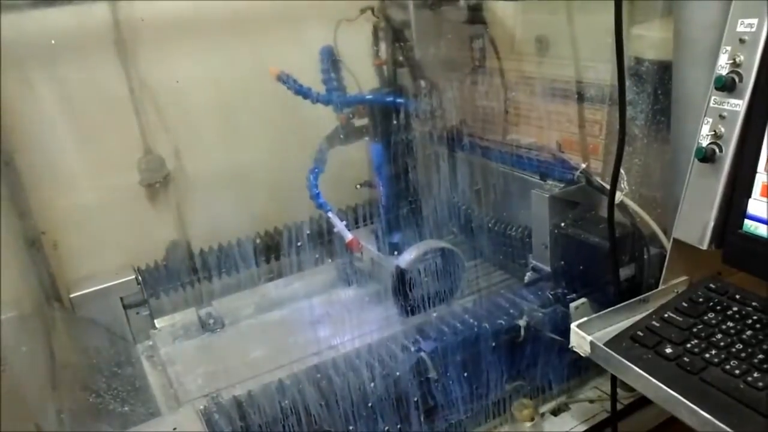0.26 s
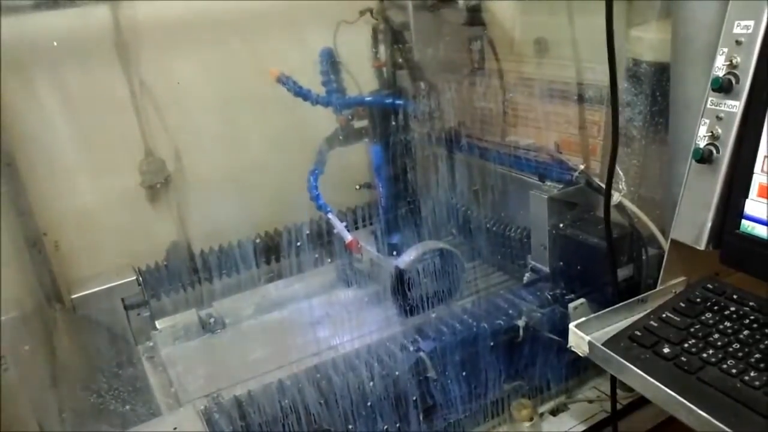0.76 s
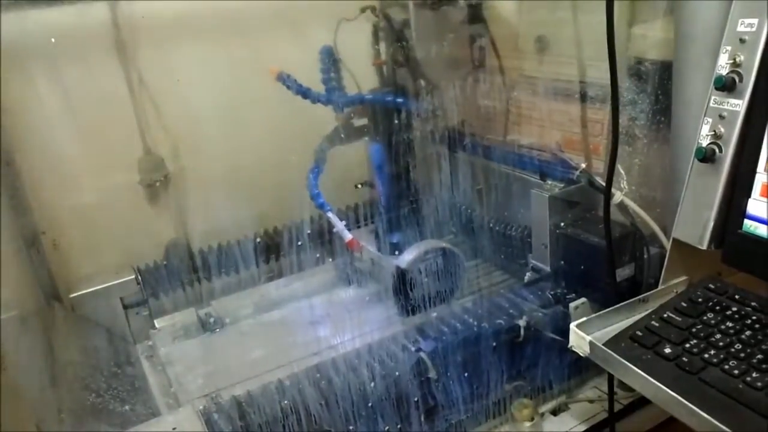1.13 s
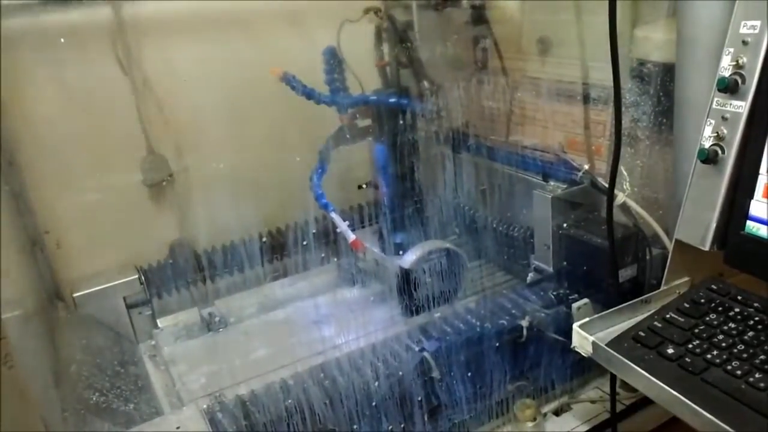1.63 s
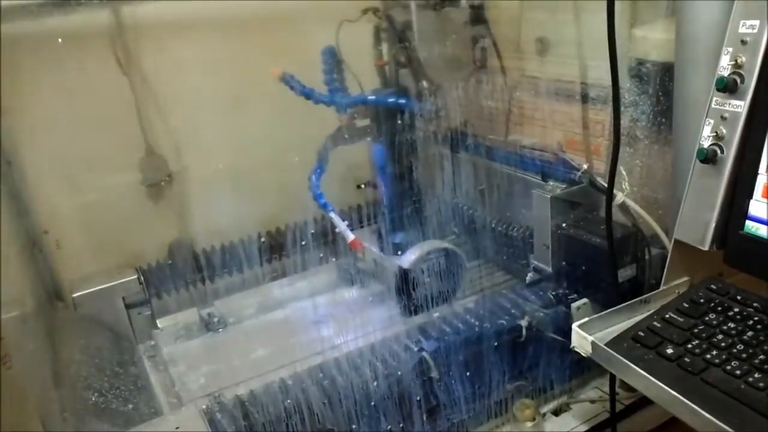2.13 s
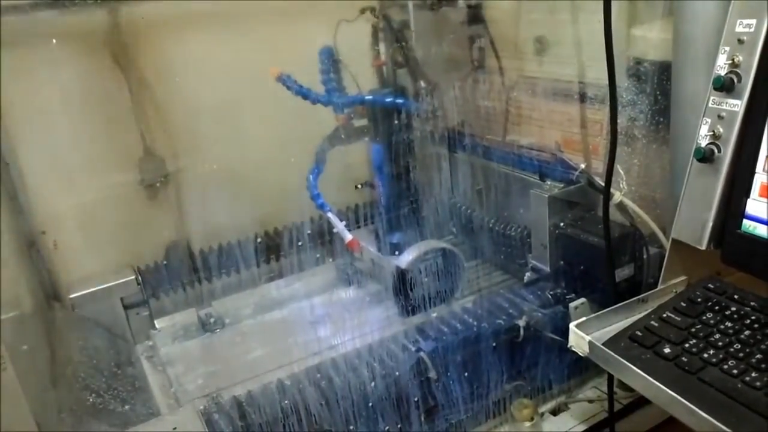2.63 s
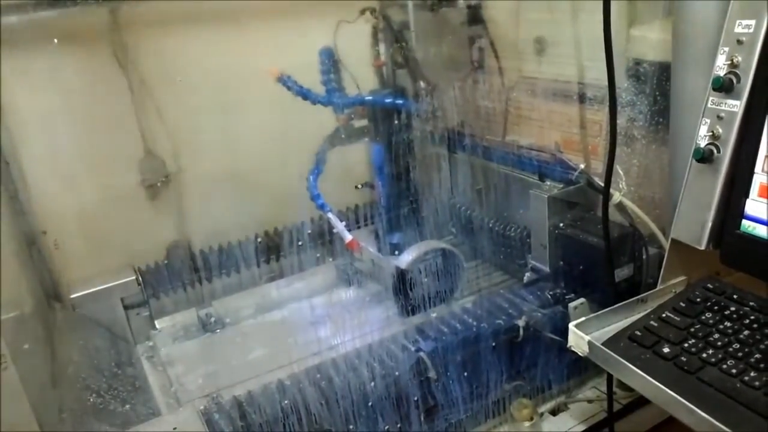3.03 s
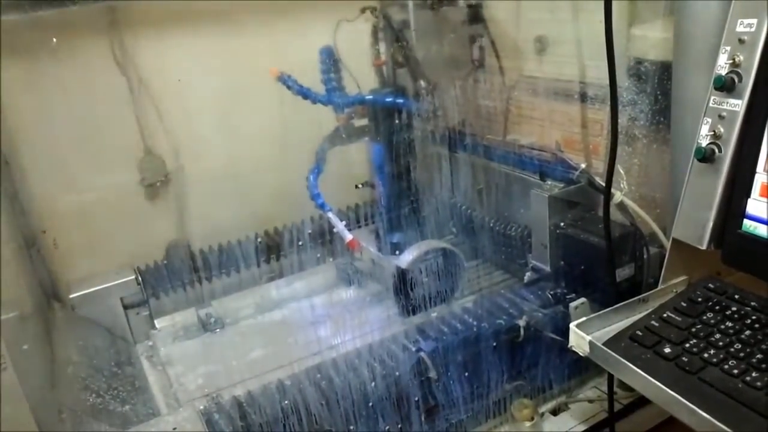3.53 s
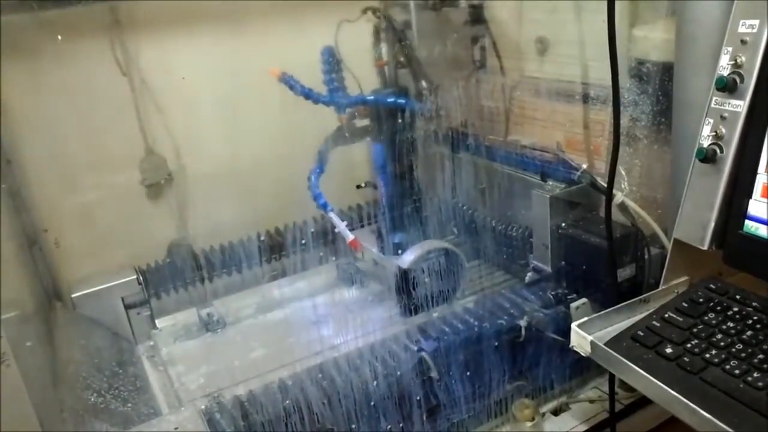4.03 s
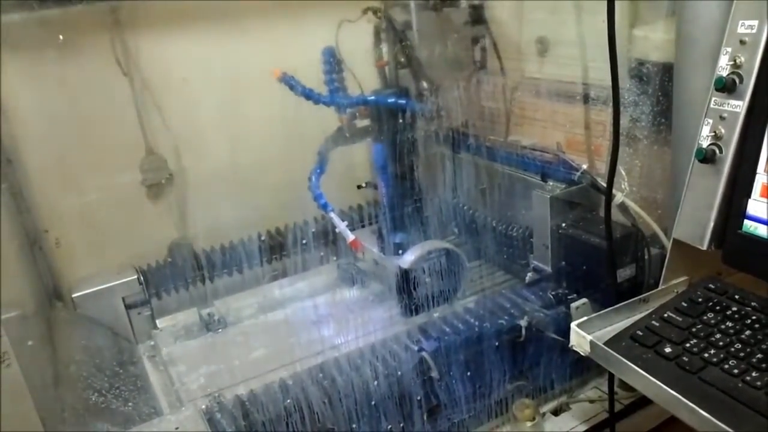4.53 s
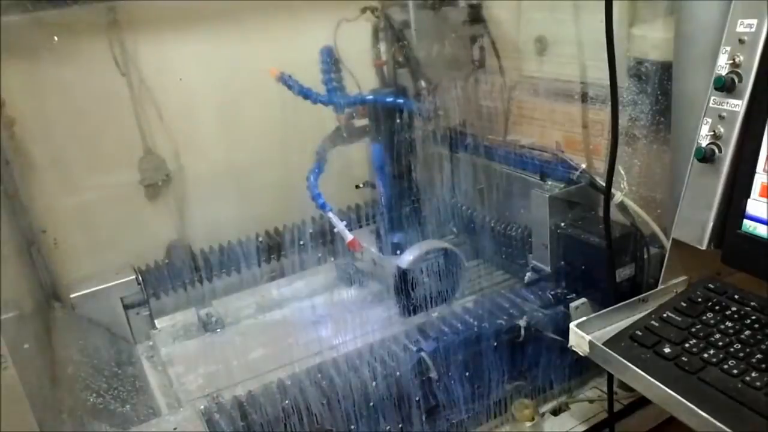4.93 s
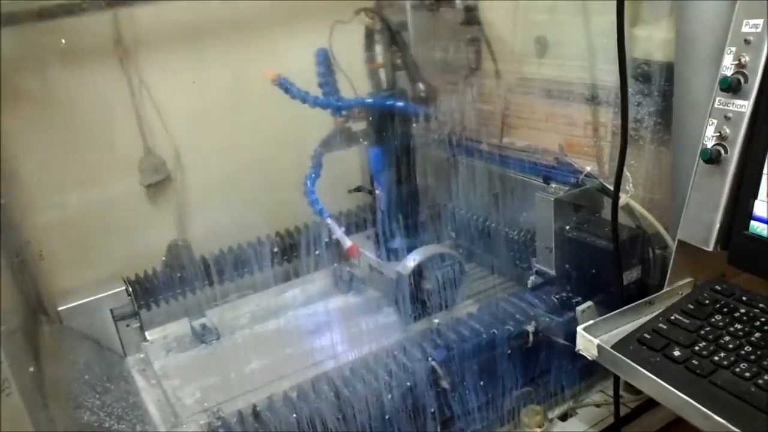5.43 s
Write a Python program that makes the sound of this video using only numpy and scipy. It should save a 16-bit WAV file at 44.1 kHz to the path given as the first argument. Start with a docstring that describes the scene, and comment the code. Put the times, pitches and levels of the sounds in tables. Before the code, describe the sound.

Close in a workshop machine cabinet, a spinning blade lightly grazes aluminium with thin squeals over motor whir and hum. Just before one second it bites with a dull thud, and the sound swells into a harsh, bright hiss and rasp, with coolant spattering, metallic chatter and snapping chips until the end.

```python
"""Close to a coolant-sprayed aluminium plate in a machine cabinet: a spinning saw blade first grazes it and squeals.
From about 0.8 s the blade bites: a low thud, then the teeth rasp in filtered impacts, the rim rings and a
strong mode chatters in bouts. Chips snap off from 1.2 s as dying bursts; flung coolant, streams of tiny
impacts, spatters and drums on the walls; from 4.8 s the cut eases a little.
Throughout, the jet hisses, the drive whirs in a pattern repeated each turn, pump and fan hum, the frame rumbles."""
import sys
import numpy as np
from scipy import signal
from scipy.fft import rfft, irfft, next_fast_len
from scipy.io import wavfile
from scipy.ndimage import uniform_filter1d

SR = 44100
rng = np.random.default_rng(int(sys.argv[2]) if len(sys.argv) > 2 else 0)


def digitize_waveform(pressure):
    """Quantize a signal to 16-bit integers and store it at the path in sys.argv[1].

    Rows of a 2-D input are taken as channels; values are limited to [-1, 1].
    """
    field = np.atleast_2d(pressure).T
    bounded = np.clip(field, -1, 1)
    quanta = np.round(bounded * 32767).astype(np.int16)
    wavfile.write(sys.argv[1], SR, quanta)


N = 250047
TIME = np.arange(N) / SR   # s

# Thuds, the burst of the bite and other swells of filtered noise. Each row: centre in seconds,
# half-length in seconds, frequency in Hz, width in Hz, rms level at the top in dB.
NOISE_SWELLS = [(0.25, 0.071, 474, 109, -49), (0.813, 0.033, 3700, 900, -39), (0.602, 0.11, 62, 28, -64),
                (0.973, 0.026, 158, 170, -43.5), (0.975, 0.027, 69.5, 30, -53),
                (1.045, 0.032, 168, 80, -54), (1.245, 0.3, 778, 110, -44), (1.4, 0.15, 58, 25, -63),
                (1.87, 0.097, 197, 130, -58), (1.948, 0.083, 60, 25, -58), (2.807, 0.32, 944, 111, -39),
                (2.953, 0.025, 3900, 130, -29.5), (5.56, 0.073, 2330, 110, -40)]
# Hum of pump and fan. Each row: time in seconds, pump level in dB, fan level in dB, both before a trim.
HUM_LEVELS = [(0.0, -61, -51), (0.22, -47.5, -48.5), (1.3, -58, -56), (1.89, -48, -68), (3.0, -56.5, -80.5),
              (5.67, -70, -71)]
# Whine of the loaded motor. Each row: multiple of its speed, rms level at full load in dB.
MOTOR_WHINE = [(10, -46), (20, -97)]

# How hard the blade cuts: grazing, biting in, cutting steadily. Each row: time in seconds, control level in dB.
CUT_DEPTH = [(0.0, -40), (0.248, -42), (0.314, -39), (0.598, -42), (0.69, -40), (0.78, -34.5),
             (0.906, -25.5), (0.938, -28), (1.25, -20.5), (2.3, -20.5), (2.608, -22.5), (2.68, -21),
             (4.25, -21.5), (4.8, -21.5), (5.604, -24), (5.67, -23.5)]
# How much coolant the blade flings in these stages. Each row: time in seconds, control level in dB.
COOLANT_FLUNG = [(0.04, -46), (0.046, -45), (0.75, -42.5), (0.8, -38), (0.812, -36.5), (0.998, -32.5),
                 (1.33, -27), (1.8, -27), (3.6, -28.5), (4.33, -28.5), (4.99, -29.5), (5.15, -29),
                 (5.67, -29.5)]
# Laws of the layers that follow one of these two curves. Each holds: level in dB at the median of the curve,
# slope in dB per dB of the curve.
HISS_FOLLOWS = (-26, 0.83)
MIST_FOLLOWS = (-32.5, 1.09)
SPATTER_FOLLOWS = (-34, 0.76)
DRUMMING_FOLLOWS = (-36, 0.68)
RASP_FOLLOWS = (-23.5, 0.88)
ZING_FOLLOWS = (-30, 0.97)
CHATTER_FOLLOWS = (-35.5, 0.77)
SQUEAL_FOLLOWS = (-32.5, 0.56)
RING_FOLLOWS = (-36.5, 0.86)

# Pace of the regular surges of the jet. Each row: start in seconds, surges per second.
JET_PACE = [(0, 5.55), (2.15, 5.03), (4.14, 6.15)]
# The one sag of the jet: centre in seconds, loss of its hiss in dB, half-length in seconds.
JET_SAG = (3.75, 2, 0.33)
# Chips snapping off the rim. Each row: time in seconds, starting force of the burst in dB.
CHIP_SNAPS = [(1.2171, -6), (1.8083, 4), (1.8577, -14), (2.0183, -7), (2.2263, -6), (3.2465, -27),
              (3.6087, -1), (3.8382, -1), (4.0013, -17), (4.5087, 2), (4.6428, -2)]
# Brief changes in the loudness of the rasp, mostly grabs of the teeth. Each row: centre in seconds, change in dB.
RASP_CHANGES = [(0.74, 5), (1.08, 5.5), (1.28, 2), (1.62, 0), (2.23, 2.5), (2.34, -0.5), (2.8, 2.5),
                (3.47, 5.5), (4.0, 4.5), (4.43, 3), (4.97, 3.5)]
# Brief changes in the loudness of the rim, mostly flares. Each row: centre in seconds, change in dB.
RIM_CHANGES = [(0.12, 9), (0.82, 5), (0.9, 1), (1.23, 2), (1.39, 2.5), (1.54, 2), (1.82, 2), (2.16, 6),
               (2.48, 3), (2.89, 2), (3.07, 3), (3.26, 4), (3.69, 0), (3.85, 2.5), (4.04, 5.5), (4.52, 0),
               (4.72, 8), (4.89, 3), (5.03, 8)]
# Squeals of the blade. Each row: centre in seconds, rise in dB, half-length in seconds.
BLADE_SQUEALS = [(0.32, 7.5, 0.05), (0.47, 6.5, .09), (0.91, 9, 0.023), (1.78, 9.5, 0.024),
                 (2.1, 2.5, .035), (2.92, 10, 0.046), (4.78, 10, 0.036)]
# Bouts of chatter. Each row: centre in seconds, rise in dB, half-length in seconds.
CHATTER_BOUTS = [(1.025, 8.5, .04), (1.428, 9, .06), (1.917, 8, 0.047), (2.305, 6, 0.14),
                 (2.53, 5.5, 0.026), (3.11, 4.5, 0.038), (3.502, 11, 0.078), (4.056, 7, 0.035),
                 (4.432, 9.5, 0.021), (4.91, 9, 0.15)]

# Resonances of what is struck. Each row: frequency in Hz, width in Hz, relative gain at the top in dB.
WALL_RESONANCES = [(780, 16, 0), (842, 14, 4.5), (905, 16, 2), (1005, 14, 1), (1345, 35, -2)]
SPATTER_RESONANCES = [(1950, 20, 3), (2150, 30, -2), (2260, 60, -1), (2720, 60, -5)]
MIST_RESONANCES = [(4005, 26, 3), (4290, 36, 2.5), (4420, 50, -3)]
PLATE_RESONANCES = [(5150, 25, -2), (6206, 18, 2.5), (6420, 26, -2), (6596, 60, 1), (7010, 45, -2)]
RING_RESONANCES = [(6020, 22, 0)]
SQUEAL_RESONANCES = [(8317, 15, 0)]
CHATTER_RESONANCES = [(3263, 28, 0), (3320, 130, -13)]
RIM_RESONANCES = [(11370, 120, -15), (11705, 38, 1.5), (12320, 28, 3), (12620, 110, -10), (12990, 70, -9),
                  (13760, 36, 3)]
TOOTH_RESONANCES = [(7790, 30, 2), (7878, 20, 9.5), (8190, 50, 1.5), (9735, 55, 8.5), (10255, 34, 8)]

# Broad spectra. Each row: frequency in Hz, relative density in dB per Hz.
RUMBLE_SPECTRUM = [(20, -18), (40, -2), (60, -10), (85, -4), (160, 1), (230, -1.5), (330, -1.5), (600, -3),
                   (1200, -45)]
WHIR_SPECTRUM = [(200, -26), (400, 1), (580, 9.5), (900, 10), (1500, -42), (2200, 11), (3700, 4), (5200, 6),
                 (6300, 2), (7200, -37), (8700, 9), (10200, 1), (10600, -18), (14000, -25)]
DRUMMING_SPECTRUM = [(150, -36), (300, -25.5), (450, -17.5), (580, -16.5), (680, -6), (790, -4.5),
                     (980, -3), (1100, -11.5), (1280, -2), (1500, -39), (2200, -7)]
SPATTER_SPECTRUM = [(900, -14.5), (1400, -6.5), (1600, -4.5), (2300, -3), (3050, -3.5), (3400, -35),
                    (3900, -26)]
MIST_SPECTRUM = [(2700, -89), (3350, -1), (3650, -8), (4400, -4.5), (4900, -4.5), (5400, -9), (7000, -31)]
HISS_SPECTRUM = [(3800, -66), (4900, -27), (5300, -10.5), (5800, -10), (6500, -14), (7300, -10),
                 (7800, -6.5), (9000, -25)]
ZING_SPECTRUM = [(9800, -36), (10500, -82), (11100, -27), (12600, -13.5), (14200, -25), (15000, -44)]
RASP_SPECTRUM = [(6500, -60), (7400, -26), (7800, -3), (8600, 0.5), (9500, 1), (10100, 0), (10300, -31),
                 (10500, -47)]

MOTOR_HZ, BLADE_HZ, TEETH = 97.2, 43.9, 14
PUMP_HZ, FAN_HZ, MAINS_RIPPLE_HZ = 300, 398, 100
FIRST_SURGE_S, SURGE_DB = 0.16, 1
RASP_CHANGE_S, RIM_CHANGE_S = 0.017, 0.03   # half-lengths
CUTOFF_HZ = 14280


def from_db(db):
    """Decibels to gain."""
    return 10 ** (np.asarray(db) / 20)


def rms_one(x):
    """Scale to unit power."""
    return x / np.sqrt(np.mean(x ** 2) + 1e-20)


def in_time(rows):
    """One value a sample for each column of a curve."""
    seconds, *columns = np.transpose(rows)
    return [np.interp(TIME, seconds, column) for column in columns]


def follow(curve, law):
    """Level in dB of a layer that rises and falls with a control curve."""
    control_db, = in_time(curve)
    median_level_db, slope = law
    return median_level_db + slope * (control_db - np.median(control_db))


def bell(s, length):
    """A smooth swell of height 1 around a moment."""
    return np.exp(-((TIME - s) / length) ** 2 / 2)


def changes(rows, length):
    """The dB that a set of equally long bells adds to a level."""
    return sum(db * bell(s, length) for s, db in rows)


def bouts(rows):
    """The dB that swells of differing lengths add to a level."""
    return sum(db * bell(s, length) for s, db, length in rows)


def drift(rate_hz):
    """Slow random wander of unit rms: noise through two equal low-pass poles at rate_hz."""
    step = 40   # samples between drawn values
    r = np.exp(-2 * np.pi * rate_hz * step / SR)
    noise = rng.standard_normal(N // step + 2002)
    slow = signal.lfilter([1], [1, -2 * r, r * r], noise)[2000:]   # drop the settling
    return np.interp(np.arange(N) / step, np.arange(len(slow)), rms_one(slow))


def turning(hz, wander):
    """Angle of a cycle whose speed wanders by a small fraction."""
    return 2 * np.pi * np.cumsum(hz * (1 + wander * drift(3.74))) / SR


def steady(x, size=4000):
    """Unit level over about a tenth of a second at the default size; faster flutter stays."""
    power = uniform_filter1d(uniform_filter1d(x ** 2, size), size)
    return x / np.sqrt(power + 1e-20)


def colour(x, spectrum):
    """Give x a broad spectrum, with a gain of -90 dB outside its points."""
    size = next_fast_len(N)
    hz, level_db = np.transpose(spectrum)
    bin_hz = np.maximum(np.arange(size // 2 + 1) * SR / size, 1)
    gain = from_db(np.interp(np.log(bin_hz), np.log(hz), level_db, left=-90, right=-90))
    return irfft(rfft(x, size) * gain, size)[:N]


def resonate(x, modes):
    """Parallel two-pole resonances, each with its own gain at the top."""
    out = 0
    for hz, width, db in modes:
        r = np.exp(-np.pi * width / SR)
        feed = [(1 - r * r) / 2, 0, (r * r - 1) / 2]
        feedback = [1, -2 * r * np.cos(2 * np.pi * hz / SR), r * r]
        out = out + from_db(db) * signal.lfilter(feed, feedback, x)
    return out


def grains(per_s, spread_db):
    """A dense stream of tiny impacts of uneven size and random sign, at unit power."""
    sizes = from_db(spread_db * np.minimum(rng.exponential(1, N), 5))
    signed = sizes * rng.choice([-1, 1], N)
    return rms_one(signed * (rng.random(N) < per_s / SR))


def boxed(x, echo_db=-13.0, count=14):
    """Close reflections from the cabinet walls leave a fine standing ripple in the spectrum."""
    out = x.copy()
    for lag in (rng.uniform(0.003, 0.04, count) * SR).astype(int):
        out[lag:] += from_db(echo_db) * x[:-lag]
    return out


def shifting(x, spread_db, size=512):
    """As the impact point wanders, nearby modes take turns: patches some 250 Hz wide and 60 ms long."""
    bins = signal.stft(x, nperseg=size)[2]
    patches = rng.standard_normal(bins.shape)
    for _ in range(2):
        patches = uniform_filter1d(patches, size=3, axis=0)   # across frequency
        patches = uniform_filter1d(patches, size=9, axis=1)   # across time
    return signal.istft(bins * from_db(spread_db * rms_one(patches)), nperseg=size)[1][:N]


def struck(force, spectrum, modes, per_s, spread_db, shift_db):
    """Impacts under a varying force: their direct noise plus the ring of what they hit."""
    direct = boxed(colour(force * grains(per_s, spread_db), spectrum))
    ringing = resonate(force * grains(per_s, spread_db), modes)
    return steady(shifting(direct + ringing, shift_db))


def cabinet(rumble_db):
    """The frame rumbles as low filtered noise, with thuds, the burst of the bite and other noise swells."""
    out = from_db(rumble_db) * rms_one(colour(rng.standard_normal(N), RUMBLE_SPECTRUM))
    for s, length, hz, width, db in NOISE_SWELLS:
        band = [(hz, width, 0)]
        noise = resonate(resonate(rng.standard_normal(N), band), band)
        out += from_db(db) * bell(s, length) * steady(noise)
    return out


def pump_and_fan():
    """Pump and fan each hum on one tone of wandering strength and phase."""
    pump_db, fan_db = in_time(HUM_LEVELS)
    pump_gain = from_db(pump_db - 6.0 + 3.5 * drift(8.9))
    pump = pump_gain * np.sin(turning(PUMP_HZ, wander=0.00627) + 0.52 * drift(39))
    fan_gain = from_db(fan_db - 7 + 2.1 * drift(11))
    fan = fan_gain * np.sin(turning(FAN_HZ, wander=0.0032) + 0.51 * drift(25))
    return np.sqrt(2) * (pump + fan)


def motor_whir(angle):
    """The motor repeats one rough random pattern on each turn."""
    harmonics, points = 144, 4096
    one_turn = rng.standard_normal(harmonics) + 1j * rng.standard_normal(harmonics)
    pattern = irfft(one_turn, points)
    repeated = np.interp(angle / (2 * np.pi), np.arange(points) / points, pattern, period=1)
    return rms_one(colour(repeated, WHIR_SPECTRUM))


def motor_whine(angle, load):
    """Under load the motor whines at multiples of its speed."""
    whine = 0
    for order, db in MOTOR_WHINE:
        gain = from_db(db + 3 * drift(8))
        whine = whine + gain * np.sin(round(order) * angle + 0.9 * drift(10))
    return np.sqrt(2) * load * whine


def drive(load, whir_db):
    """Whir and whine share the turning of one motor shaft; pump and fan hum beside it."""
    angle = turning(MOTOR_HZ, wander=0.00092)
    return from_db(whir_db) * motor_whir(angle) + motor_whine(angle, load) + pump_and_fan()


def surge():
    """The regular swing of the jet, between -1 and 1."""
    starts, rates = np.transpose(JET_PACE)
    pace = rates[np.searchsorted(starts, TIME, side="right") - 1]
    cycles = np.cumsum(pace) / SR
    return np.cos(2 * np.pi * (cycles - np.interp(FIRST_SURGE_S, TIME, cycles)))


def sag():
    """The dB that the hiss of the jet loses for a moment."""
    s, loss_db, length = JET_SAG
    return loss_db * bell(s, length)


def jet_hiss():
    """The jet hisses on blade and plate, surging regularly, with a faint 100 Hz mains ripple."""
    ripple = from_db(0.9 * np.cos(turning(MAINS_RIPPLE_HZ, wander=0.003)))
    level_db = follow(CUT_DEPTH, HISS_FOLLOWS) + SURGE_DB * surge() - sag()
    return from_db(level_db) * struck(ripple, HISS_SPECTRUM, PLATE_RESONANCES,
                                      per_s=17000, spread_db=3.5, shift_db=4.0)


def mist():
    """Fine impacts of flung coolant, uneven in force, hiss below the jet."""
    force = from_db(3.2 * drift(21))
    return from_db(follow(COOLANT_FLUNG, MIST_FOLLOWS)) * struck(
        force, MIST_SPECTRUM, MIST_RESONANCES, per_s=12000, spread_db=-0.5, shift_db=1.5)


def spatter():
    """Flung drops spatter on the walls as a dense stream of impacts."""
    force = from_db(1.1 * drift(56))
    return from_db(follow(COOLANT_FLUNG, SPATTER_FOLLOWS)) * struck(
        force, SPATTER_SPECTRUM, SPATTER_RESONANCES, per_s=9000, spread_db=2.5, shift_db=2.5)


def drumming():
    """Sparser impacts of flung coolant drum on the walls and ring their low modes."""
    force = from_db(2.6 * drift(43))
    return from_db(follow(COOLANT_FLUNG, DRUMMING_FOLLOWS)) * struck(
        force, DRUMMING_SPECTRUM, WALL_RESONANCES, per_s=5000, spread_db=1.0, shift_db=1.3)


def coolant():
    """The jet on blade and plate, and what the blade flings off."""
    return jet_hiss() + mist() + spatter() + drumming()


def chips(decay_s):
    """A chip catches: a sudden, quickly dying burst of impacts on the rim."""
    force = np.zeros(N)
    for s, db in CHIP_SNAPS:
        force += from_db(db) * (TIME >= s) * np.exp(-np.abs(TIME - s) / decay_s)
    burst = force * grains(5200, 2.5)
    return colour(burst, ZING_SPECTRUM) + resonate(burst, RIM_RESONANCES)


def ring():
    """One strong mode rings with the flung coolant and sways with the jet."""
    level_db = follow(COOLANT_FLUNG, RING_FOLLOWS) + 1.3 * surge() - 2 * sag() + 1.5 * drift(16)
    return from_db(level_db) * steady(resonate(grains(3500, 5.2), RING_RESONANCES))


def squeal():
    """A narrow mode of the blade swells into short squeals."""
    level_db = follow(CUT_DEPTH, SQUEAL_FOLLOWS) + bouts(BLADE_SQUEALS) + 1.7 * drift(12)
    return from_db(level_db) * steady(resonate(grains(2700, 0.55), SQUEAL_RESONANCES), size=900)


def chatter(tooth_force):
    """The force of the teeth drives a strong mode that swells in bouts."""
    level_db = follow(CUT_DEPTH, CHATTER_FOLLOWS) + bouts(CHATTER_BOUTS) + 2.0 * drift(18)
    return from_db(level_db) * steady(resonate(tooth_force * grains(4000, 2.7), CHATTER_RESONANCES))


def zing(rim_force):
    """Impacts on the rim ring high, with brief changes in loudness."""
    level_db = follow(CUT_DEPTH, ZING_FOLLOWS) + changes(RIM_CHANGES, RIM_CHANGE_S) + 1.35 * drift(4.4)
    return from_db(level_db) * struck(rim_force, ZING_SPECTRUM, RIM_RESONANCES,
                                      per_s=6600, spread_db=5.5, shift_db=0.6)


def rasp(tooth_force):
    """The teeth scrape as a dense stream of impacts, with brief changes in loudness."""
    level_db = follow(CUT_DEPTH, RASP_FOLLOWS) + changes(RASP_CHANGES, RASP_CHANGE_S) + 0.88 * drift(4.5)
    return from_db(level_db) * struck(tooth_force, RASP_SPECTRUM, TOOTH_RESONANCES,
                                      per_s=14000, spread_db=3.0, shift_db=2.3)


def saw():
    """The blade runs out of true: it bites harder once a turn, tooth by tooth, and grabs unevenly."""
    angle = turning(BLADE_HZ, wander=0.0055)
    runout, tooth, grab = np.cos(angle), np.cos(TEETH * angle), drift(29)
    tooth_force = from_db(0.37 * runout + 0.5 * tooth + 1.44 * grab)
    rim_force = from_db(0.8 * runout + 0.7 * tooth + 1.4 * grab)
    return rasp(tooth_force) + zing(rim_force) + chatter(tooth_force) + squeal() + ring()


def scene():
    """All sources at one close microphone, the same in both channels."""
    # more coolant flies the deeper the blade sits, so it stands for the motor's load
    load = np.clip(from_db(follow(COOLANT_FLUNG, (0, 1))), 0, 1)
    background = cabinet(rumble_db=-58.5) + drive(load, whir_db=-45.0)
    mix = background + coolant() + chips(decay_s=0.0085) + saw()
    return np.array([mix, mix])


def record(dry):
    """The treble is cut steeply by an elliptic low-pass."""
    low_pass = signal.ellip(14, 0.1, 90, CUTOFF_HZ, fs=SR, output="sos")
    return signal.sosfilt(low_pass, dry)


dry = scene()
out = record(dry)
digitize_waveform(out)
```